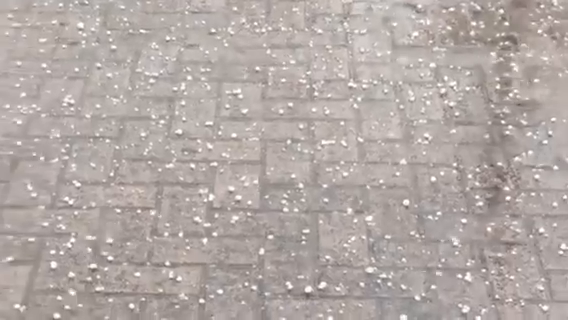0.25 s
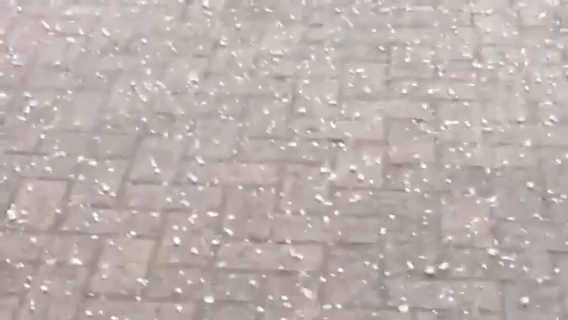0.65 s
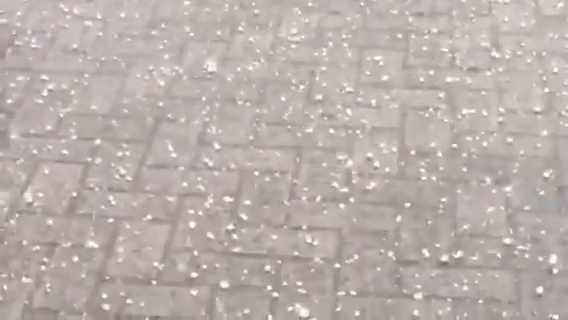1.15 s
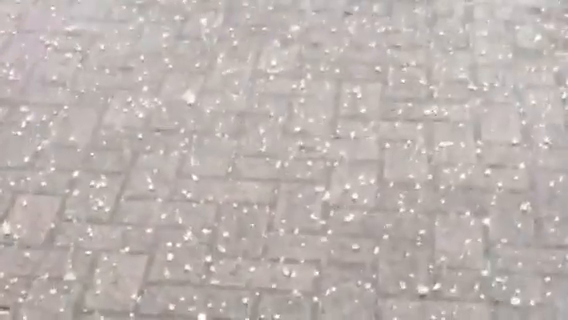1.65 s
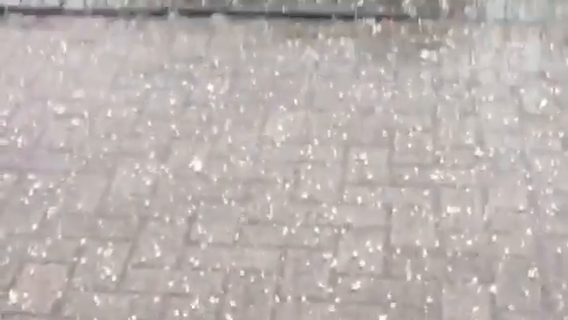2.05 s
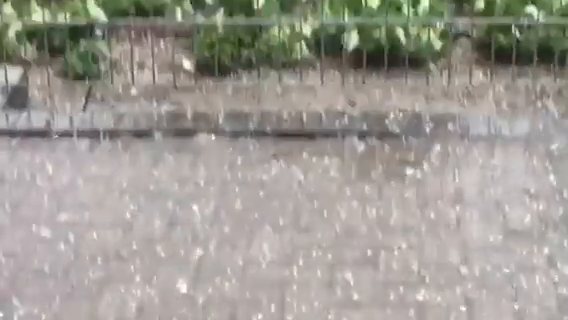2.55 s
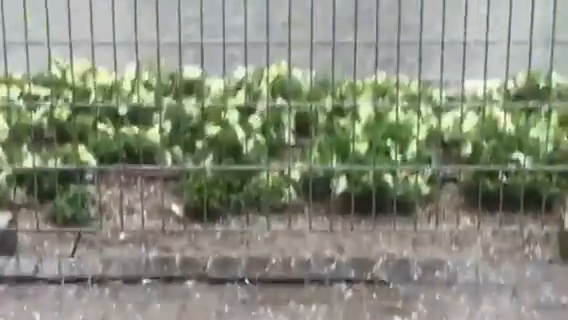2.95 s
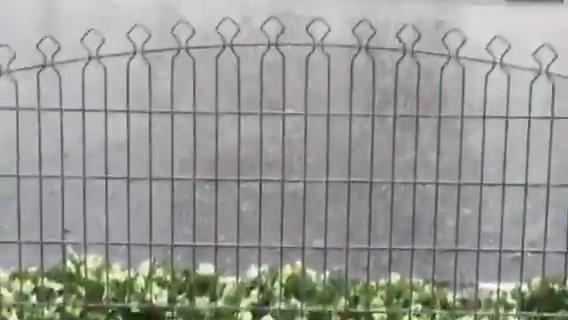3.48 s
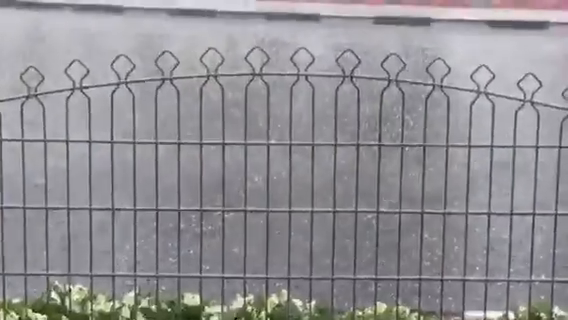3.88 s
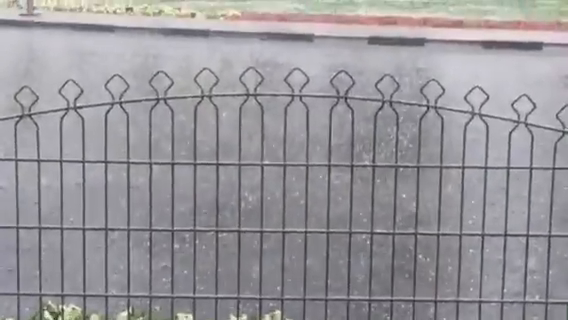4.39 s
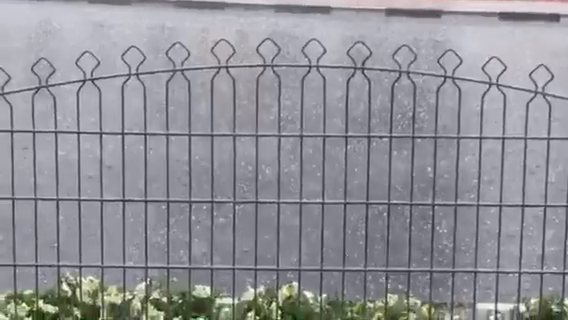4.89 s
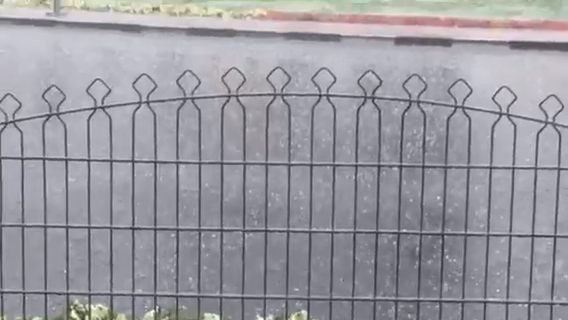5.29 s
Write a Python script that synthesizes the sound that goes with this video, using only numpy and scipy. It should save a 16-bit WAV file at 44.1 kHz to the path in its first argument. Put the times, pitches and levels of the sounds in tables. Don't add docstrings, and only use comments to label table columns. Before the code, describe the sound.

A steady, dense wash of hail fills the whole clip, covered in rapid dry ticks. A faint throbbing whine falls away in the first second while an idling engine hums low underneath. Irregular hard clicks of close stones stand out, with tiny short metallic pings and a quick hollow rattle just before the end. Open street with short echo from walls and kerb, one small mono microphone, thin deep bass.

```python
import sys
import numpy as np
from scipy import signal
from scipy.io import wavfile
from scipy.ndimage import uniform_filter1d

SR = 44100
rng = np.random.default_rng(int(sys.argv[2]) if len(sys.argv) > 2 else 0)


def int16_out(signal):
    q = np.round(np.clip(np.atleast_2d(signal).T, -1, 1) * 32767)
    wavfile.write(sys.argv[1], SR, q.astype(np.int16))


def gain_from_db(level_db):
    decades = np.asarray(level_db, float) / 20
    return 10 ** decades


N = 243917


def evened(x):
    return x / np.sqrt(np.mean(x ** 2) + 1e-20)


def read(points, hz):
    f, value = np.transpose(points)
    return np.interp(np.log(hz + 1), np.log(f + 1), value)


def add(mix, s, sound):
    part = mix[round(s * SR):][:len(sound)]
    part += sound[:len(part)]


def drift(rate_hz):
    slow = signal.butter(2, rate_hz, fs=SR, output="sos")
    wander = signal.sosfilt(slow, rng.standard_normal(N + SR))
    return evened(wander[SR:])


def noise(spectrum, patchy_db, size):
    hz = np.fft.rfftfreq(size, 1 / SR)
    a, b, patches = rng.standard_normal((N * 4 // size + 5, len(hz), 3)).T
    patches = uniform_filter1d(patches, size=12, axis=0)
    patches = evened(uniform_filter1d(patches, size=10, axis=1))
    level_db = read(spectrum, hz)[:, None] + patchy_db * patches
    z = (a + 1j * b) * gain_from_db(level_db)
    return evened(signal.istft(z, nperseg=size, noverlap=size * 3 // 4)[1][:N])


def click(hz, turns, phase):
    t = (np.arange(160) - 32) / SR
    lopsided = np.where(t < 0, .7, 1.3)
    width = lopsided * turns / (2 * hz)
    return np.exp(-(t / width) ** 2) * np.cos(2 * np.pi * hz * t + phase)


def ring(hz, t60):
    t = np.arange(SR // 10) / SR
    soft_start = 1 - np.exp(-t / 0.0029)
    return gain_from_db(-60 * t / t60) * soft_start * np.sin(2 * np.pi * hz * t)


def scatter(shapes, per_s, spread_db, cap):
    chance = per_s * gain_from_db(3.7 * drift(9)) / SR
    strength = gain_from_db(spread_db * np.minimum(rng.exponential(1, N), cap))
    hits = strength * (rng.random(N) < chance)
    which = rng.integers(0, len(shapes), N)
    return evened(sum(signal.oaconvolve(hits * (which == k), shape)[:N] for k, shape in enumerate(shapes)))


# pitch in Hz, level in dB per Hz.
FAR_HAIL_SPECTRUM = [(190, -20), (320, -0.5), (400, -2), (594, -2.5), (950, -1), (1500, -1), (2150, 0),
                     (2800, -2.5), (3700, -1.5), (4550, -4), (5800, -6), (7800, -10), (9030, -7),
                     (10000, -10), (13000, -8)]


def wash():
    body = noise(FAR_HAIL_SPECTRUM, patchy_db=1.03, size=512)
    return gain_from_db(-22.5 + 0.13 * drift(0.99) + 0.25 * drift(20)) * body


def patter():
    pitches = np.geomspace(2800, 10500, num=24)
    phases = rng.uniform(0, 2 * np.pi, 24)
    clicks = [click(hz, 0.71, phase) for hz, phase in zip(pitches, phases)]
    pings = [ring(hz, 0.01) for hz in np.geomspace(1900, 9800, num=44)]
    dry = gain_from_db(-29.0) * scatter(clicks, per_s=1600, spread_db=3.0, cap=3.1)
    no_bass = signal.butter(2, 1800, "high", fs=SR, output="sos")
    dry = signal.sosfilt(no_bass, dry)
    return dry + gain_from_db(-38) * scatter(pings, per_s=250, spread_db=3.0, cap=4.9)


# time in seconds, base rate in Hz.
IDLE_SPEED = [
    (0, 49.04),
    (.6, 48.57),
    (2.3, 46.85),
    (4.4, 46.02),
    (5.53, 46.7),
]


def engine_turns():
    s, rate_hz = np.transpose(IDLE_SPEED)
    steady_hz = np.interp(np.arange(N) / SR, s, rate_hz)
    return np.cumsum(steady_hz * (1 + 0.0063 * drift(6.1))) / SR


# pitch in Hz, level in dB per Hz.
RUMBLE_SPECTRUM = [(22, -25), (36, -16), (46, -1.5), (56, -3), (80, -0.5), (120, -1.5), (200, -2.5),
                   (290, -6), (330, -12.5), (500, -42)]


def street_rumble(turns):
    t = np.arange(N) / SR
    rise_db = 0.51 * t
    throb_db = 0.95 * np.sin(np.pi * turns) + 1.4 * drift(11.7)
    return gain_from_db(-32.5 + rise_db + throb_db) * noise(RUMBLE_SPECTRUM, patchy_db=1.7, size=4096)


def swells(rows):
    t = np.arange(N) / SR
    level = gain_from_db(-51.5)
    edge_s = 0.094
    for s, length, db in rows:
        inside = np.minimum(t - s, s + length - t)
        level = level + gain_from_db(db) * np.clip(inside / edge_s + .5, 0, 1)
    return level


MULTIPLES = (1, 2, 3, 4, 6)
# start in seconds, length in seconds, level in dB.
BOOMS = [
    [(-.1, 5.8, -51.5)],
    [(-.1, 0.4, -36.5), (.3, .8, -43), (1.75, 0.47, -38.5), (2.25, 0.4, -37), (2.65, .85, -42),
     (3.55, 0.94, -36.5), (4.8, 0.93, -38)],
    [(-.1, 0.24, -39), (3.0, .45, -44), (4.25, 0.51, -40), (4.82, 0.65, -40)],
    [(.22, 1, -41), (1.5, .4, -43), (2.25, 0.32, -42), (2.9, 0.68, -48), (4.82, 0.29, -35.5)],
    [(-.1, 1.25, -39), (1.25, 0.73, -39.5), (2.3, 0.31, -36.5), (3.05, 0.32, -42), (3.68, 0.3, -38.5),
     (4.1, 0.51, -41.5), (4.98, 0.48, -34)],
]


def engine_hum(turns):
    hum = np.zeros(N)
    for k, rows in zip(MULTIPLES, BOOMS):
        waver_db = 2.24 * drift(13) + 1.2 * np.sin(np.pi * turns)
        hum += swells(rows) * gain_from_db(waver_db) * np.sin(2 * np.pi * k * turns)
    return np.sqrt(2) * hum


def whine():
    t = np.arange(N) / SR
    length_s, start_hz, sag_hz_per_s = 0.87, 895, 140
    hz = (start_hz - sag_hz_per_s * np.minimum(t, 1)) * (1 + 0.0048 * drift(15))
    beat_db = 6 * np.cos(2 * np.pi * 11.5 * (t - 0.522))
    arch = np.sin(np.pi * np.clip(t / length_s, 0, 1))
    level = gain_from_db(-40 + beat_db + 0.74 * drift(10)) * arch
    return np.sqrt(2) * level * np.sin(2 * np.pi * np.cumsum(hz) / SR)


# time in seconds, peak level in dB, click pitch in Hz.
NEAR_STONES = [(0.4153, -12, 3300), (0.4243, -10.5, 5900), (0.5035, -15, 4500), (0.7583, -4.5, 4600),
               (0.848, -4, 5200), (0.88, -12, 4400), (1.0378, -6, 4000), (1.1332, -5, 4900),
               (1.4687, -11, 4350), (1.6163, -8, 5420), (1.6304, -10, 4900), (1.873, -6, 3500),
               (2.481, -14, 3600), (2.6446, -12, 3500), (2.6514, -8, 6000), (2.7688, -14, 3600),
               (3.0013, -4, 5900), (3.1485, -5, 4900), (3.1565, -15, 3700), (3.2005, -13, 7500),
               (3.3384, -9, 4900), (3.478, -8, 6000), (3.864, -13, 4000), (3.965, -6, 3600),
               (4.1587, -4, 4800), (4.6638, -8, 3800), (4.722, -8, 2500), (4.9972, -7, 2800),
               (5.0938, -9, 4400), (5.4335, -8.5, 5900)]


def near_stones():
    out = np.zeros(N)
    for s, db, hz in NEAR_STONES:
        phase = rng.uniform(0, 2 * np.pi)
        add(out, s - 32 / SR, gain_from_db(db) * click(1.1 * hz, 1.4, phase))
    return out


# time in seconds, peak level in dB, pitch in Hz.
FENCE_RINGS = [(1.209, -18, 9100), (2.691, -18.5, 9330), (2.693, -16, 8900), (2.706, -16, 2090),
               (2.716, -21, 2120), (2.762, -19, 3650), (2.764, -14, 3220), (2.792, -16, 2140),
               (3.756, -17, 9160), (5.412, -21, 2400), (5.453, -14, 2380), (5.474, -20, 2430),
               (5.475, -24, 2650), (5.496, -17, 1046)]


def fence_rings():
    out = np.zeros(N)
    for s, db, hz in FENCE_RINGS:
        add(out, s, gain_from_db(db) * ring(hz, t60=0.038))
    return out


def rattle():
    out = np.zeros(N)
    end_s, gap_s, slower, hz = 5.4732, .0033, 1.08, 646
    cycle = round(SR / hz)
    knock = -np.hanning(2 * cycle) * np.cos(2 * np.pi * np.arange(2 * cycle) / cycle)
    for k in range(5):
        s = end_s - k * gap_s * slower ** k
        add(out, s - cycle / SR, gain_from_db(-12.5 - 3 * k) * knock)
    return out


def walls(x):
    t = np.arange(SR // 8) / SR
    tail = rng.standard_normal(len(t)) * gain_from_db(-60 * t / 0.28) * (t > .002)
    return signal.oaconvolve(x, tail / np.linalg.norm(tail))[:N]


def scene():
    far = wash()
    hits = patter() + near_stones() + fence_rings() + rattle()
    turns = engine_turns()
    engine = engine_hum(turns) + whine() + street_rumble(turns)
    mono = far + hits + gain_from_db(-8.5) * walls(hits) + engine
    return np.array([mono, mono])


# pitch in Hz, gain in dB.
HOUSING_GAIN = [(30, -11), (42, 0), (4550, 0), (4850, -3.5), (5100, -1), (5700, 0)]


def housing_db(hz):
    return read(HOUSING_GAIN, hz)


def top_cut(x):
    return signal.sosfilt(signal.butter(12, 10930, fs=SR, output="sos"), x)


def record(dry):
    hz, _, z = signal.stft(dry[0], SR, nperseg=2048)
    roll_off_db = .0155 * np.maximum(hz - 10000, 0)
    z = z * gain_from_db(housing_db(hz) - roll_off_db)[:, None]
    below_edge = z[(hz > 9000) & (hz < 10000)]
    typical = np.sqrt(np.mean(abs(below_edge) ** 2))
    threshold_db = -5.8 + 1.8 * rng.standard_normal(z.shape[1])
    kept = (hz[:, None] < 10050) | (abs(z) > gain_from_db(threshold_db) * typical)
    mono = signal.istft(z * kept, SR, nperseg=2048)[1][:N]
    return top_cut(np.array([mono, mono]))


dry = scene()
out = record(dry)
int16_out(out)
```